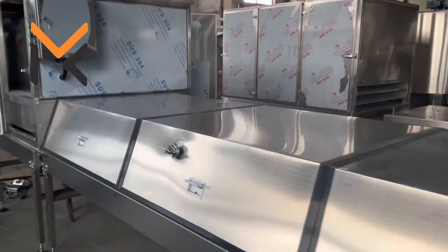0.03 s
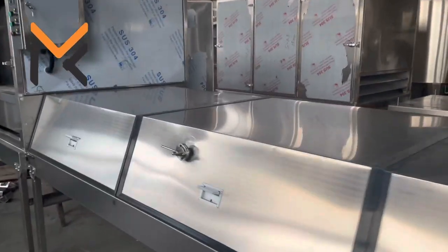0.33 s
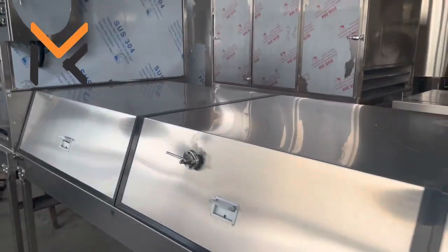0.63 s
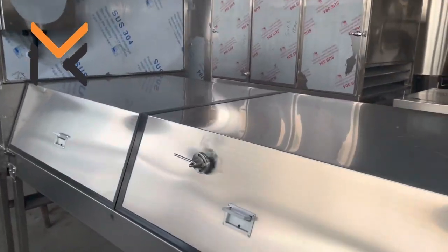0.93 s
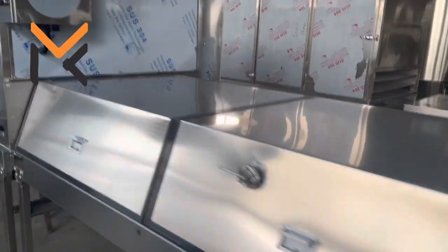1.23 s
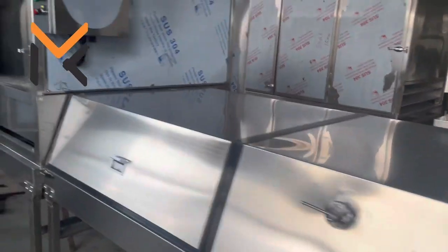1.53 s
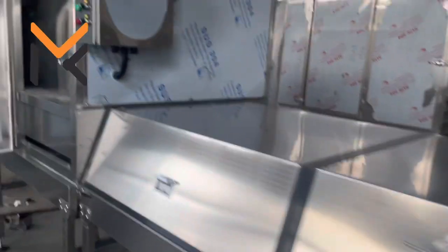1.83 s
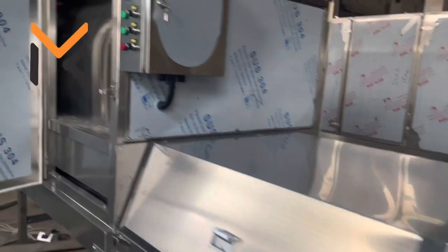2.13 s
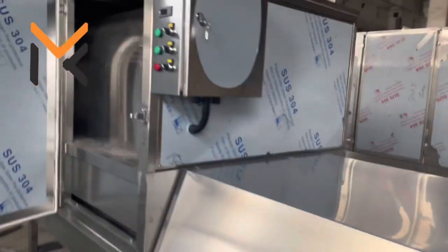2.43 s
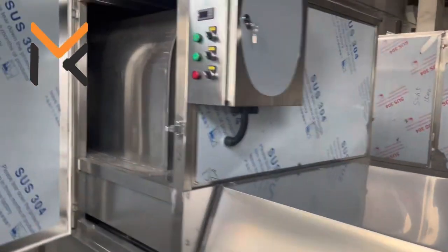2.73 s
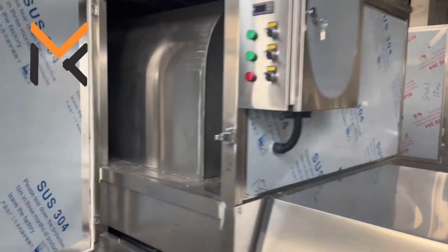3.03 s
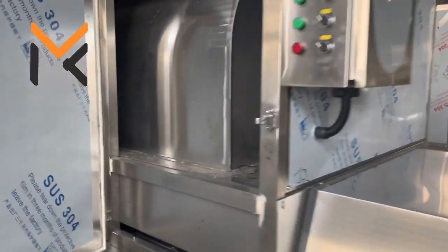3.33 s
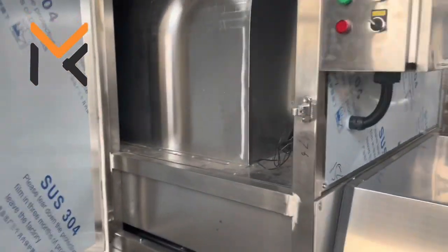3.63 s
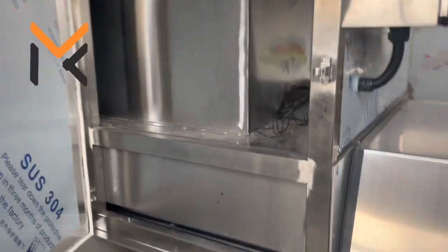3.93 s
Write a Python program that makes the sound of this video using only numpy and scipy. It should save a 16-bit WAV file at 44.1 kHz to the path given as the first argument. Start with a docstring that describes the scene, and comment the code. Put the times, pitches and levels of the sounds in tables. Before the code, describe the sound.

A large steel sheet is struck twice across a workshop hall, each bright crash swelling into a slowly fading boom. A small metal part then clinks near the microphone, followed by faint knocks, while machinery rumbles steadily.

```python
"""A sheet-metal workshop

Machinery rumbles under a faint motor whine. Across the hall a big steel sheet is struck twice:
its high modes ring at once as a crash, while its low modes build up into a slowly fading boom.
A small steel part scrapes and clinks nearby; ticks, far clanks and hisses of other work come and go."""
import sys
import numpy as np
from scipy import signal
from scipy.fft import rfft, irfft
from scipy.io import wavfile
from scipy.ndimage import map_coordinates

SR = 44100
rng = np.random.default_rng(int(sys.argv[2]) if len(sys.argv) > 2 else 0)


def digitize_waveform(pressure):
    """Quantize a signal to 16-bit integers and store it at the path in sys.argv[1].

    Rows of a 2-D input are taken as channels; values are limited to [-1, 1].
    """
    field = np.atleast_2d(pressure).T
    bounded = np.clip(field, -1, 1)
    quanta = np.round(bounded * 32767).astype(np.int16)
    wavfile.write(sys.argv[1], SR, quanta)


N = 176400
T = np.arange(N) / SR
HZ = np.fft.rfftfreq(N, 1 / SR)

# Spectra of the noises. Each row: frequency in Hz, relative spectral density in dB.
RUMBLE_SPECTRUM = [(15, -60), (26, -38), (35, -13.5), (52, 4.5), (68, 3), (95, -6.5), (125, -11.5),
                   (170, -9.5), (260, -42.5), (440, -75)]
HALL_SPECTRUM = [(70, -8.5), (125, -1), (170, -2), (220, -3), (300, -2.5), (450, -11), (640, -10.5),
                 (900, -9), (1400, -16.5), (1900, -19), (2300, -20.5), (2600, -24), (3300, -29),
                 (4000, -31), (4700, -36.5), (6600, -40.5), (8500, -56.5), (11500, -43), (13500, -50),
                 (15500, -56.5)]
SNAP_SPECTRUM = [(500, -12), (1100, 1), (2500, -4), (3600, 3), (4800, -10), (8000, -17), (11000, -18),
                 (15000, -32)]
CRACK_SPECTRUM = [(300, -17), (1000, 6), (3500, 7), (4800, -8), (8000, -16), (11000, -10.5), (15000, -34)]
SCRAPE_SPECTRUM = [(400, 9), (750, 0), (1400, 4), (2500, 4), (3300, 7.5), (4800, -4.5), (5600, -7),
                   (8000, -15), (11000, -11), (13000, -22), (15500, -22)]
# Likeness of the two channels. Each row: frequency in Hz, left-right correlation.
HALL_COHERENCE = [(50, 0.94), (150, 0.94), (300, 0.69), (600, 0.23), (1200, -0.18), (4000, 0.17),
                  (12000, 0.11)]
SHEET_COHERENCE = [(150, 0.96), (300, 0.9), (600, 0.32), (1100, 0.13), (2200, 0), (4000, 0.73), (7000, 0.2)]
CONTACT_COHERENCE = [(500, 0.6), (1100, -0.3), (3500, -0.07), (6000, -0.7), (11000, -0.15)]
# Stereo balance. Each row: frequency in Hz, left minus right level in dB.
BALANCE = [(60, 0), (130, -3), (290, -1), (640, 0.5), (1410, -1), (3100, 0), (6820, 1.0), (15000, -0.5)]

# Swells of the rumble. Each row: centre in seconds, gain in dB, half length in seconds.
SURGES = [(0.253, 10, 0.042), (0.487, 3.5, 0.088), (1.957, 9.5, 0.051), (2.166, 5, 0.093),
          (2.51, 5.5, 0.034), (2.833, 9.5, 0.016), (3.06, 2.5, 0.029), (3.88, 7, 0.049)]
# The hall's broad noise. Each row: time in seconds, level in dB.
HALL_LEVEL = [(0, -43.5), (.5, -42.5), (2.2, -43), (2.8, -44.5), (3.45, -45), (3.7, -45.5), (4, -46.5)]
# Motor partials. Each row: frequency in Hz, level in dB, width in Hz, share of the drift in dB per dB.
WHINE_PARTIALS = [(861, -65.5, 35, 0), (1987, -70.5, 9, 1.3), (2014, -70.5, 9, .6), (2460, -70, 14, -1.3),
                  (2505, -73, 30, -.8)]
# The whine's weight drifts to its lower partials. Each row: time in seconds, drift in dB.
WHINE_DRIFT = [(0, -2), (2.55, -1.5), (2.68, 2.5), (3.4, 1), (4, 4.5)]
# Ticks, taps and far clanks. Each row: start in seconds, level in dB, band centre in Hz,
# width in octaves, rise and T60 in seconds.
KNOCKS = [(.038, -63, 6000, .6, .0005, .035), (.0705, -63, 6000, .6, .0005, .035),
          (.161, -63, 5500, .6, .0005, .035), (.1945, -61, 6000, .6, .0005, .035),
          (.4703, -53, 4500, .6, .0002, .008), (2.2, -54, 900, .3, .006, .25),
          (2.43, -55, 900, .3, .006, .3), (2.6655, -38, 1650, .42, .0002, .014),
          (2.925, -52, 950, .3, .008, .4), (3.175, -48.5, 950, .25, .006, .3),
          (3.421, -47.5, 900, .28, .005, .33), (3.423, -60, 3700, .25, .003, .23),
          (3.881, -38.5, 436, .57, .0012, .066)]
# Soft hisses. Each row: centre in seconds, level in dB, band centre in Hz, width in octaves,
# half length in seconds.
HISSES = [(0.483, -71, 5000, .32, 0.093), (2.453, -68.5, 5330, .11, 0.19), (2.706, -75, 11100, 0.23, 0.068),
          (3.392, -74.5, 11200, 0.25, 0.047), (3.918, -71, 10100, 0.38, 0.038),
          (3.93, -66, 4280, 0.49, 0.056)]
# Hammer blows. Each row: start in seconds, gain of wash and snap in dB, the wash's treble tilt in dB
# per octave, its gains below 450 Hz and below 220 Hz in dB, the sheet's left minus right level in dB.
BLOWS = [(0.5638, -1, 2, 0.5, -5.5, -.5), (1.117, -1.9, 1.73, -1, 3, 0)]
# The sheet's wash of dense modes. Each row: frequency in Hz, relative density in dB,
# rise and T60 in seconds.
WASH_BANDS = [(106, 1.5, 0.45, 2.9), (170, 10, 0.55, 3.05), (212, 2.5, 0.24, 3.93), (269, 7.5, 0.11, 3.6),
              (409, 5, 0.47, 3.2), (426, -6, 0.026, 4.9), (637, -2, 0.0015, 3.26),
              (827, -14.5, 0.0083, 4.2), (1035, -6.5, 0.0031, 3.4), (1170, -11.5, .004, 1.85),
              (1650, -17, .008, 3.1), (2050, -23.5, 0.012, 3.4), (2650, -22, 0.013, 3.6),
              (3250, -24, .004, 1.5), (4350, -33, 0.0082, 1.65), (6820, -32, 0.0066, 0.92),
              (8330, -56, .002, 0.36), (11000, -42, .004, 0.67), (15000, -64, .002, .35)]
# Its strongest modes. Each row: frequency in Hz, peak levels in the first and second blow in dB,
# rise and T60 in seconds.
SHEET_MODES = [(262, -36.5, -39.5, .11, 2), (305, -39, -41, .13, 1.8), (345, -39.5, -45, .25, 1.7),
               (372, -46, -39.5, .45, 1.8), (409, -49, -45.5, .45, 1.8), (538, -42, -44, .01, 1.9),
               (590, -45, -46, .005, 1.2), (640, -44, -45, .01, 1.9), (705, -52, -48, .01, 1.9),
               (842, -47, -50, .005, 1.5), (953, -48, -54, .005, 1.6), (1010, -45, -48, .003, 1.5),
               (1048, -43, -38.5, .003, 1.6), (1072, -41, -43, .003, 1.7), (1256, -56, -44, .003, 1.7),
               (1388, -49.5, -52, .005, 1.6), (1495, -43.5, -47, .003, 1.9), (1530, -52, -50, .005, 1.8),
               (1620, -51, -50.5, .005, 1.7), (1758, -54, -51, .005, 1.9), (1812, -54, -51, .005, 1.9),
               (2274, -49.5, -54, .005, 2.7), (2305, -54, -53, .005, 2.9), (2557, -56, -62, .005, 2),
               (2643, -55, -59, .005, 2), (2762, -58, -55, .005, 1.7), (3362, -60.5, -58, .005, 2),
               (3520, -44, -56, .0007, .25), (3850, -45, -55, .0007, .22)]
# Contacts of hammer and rattling sheet. Each row: start in seconds, gain in dB,
# relative level of the body near 1 kHz in dB.
CRACKS = [(0.564, -2.5, 2), (0.581, 6.5, -9), (.657, -13, 7), (1.119, -3, 13)]
# Contacts of the small part. Each row: start in seconds, gain in dB, rise in seconds.
CLINKS = [(1.906, -11.5, 0.0041), (1.921, 1.5, .006), (1.9285, -1.5, 0.0039), (1.941, -10.5, 0.0018),
          (1.951, -16, .001)]
# Its modes. Each row: frequency in Hz, level in dB, T60 in seconds.
PART_MODES = [(1850, -48, .1), (2400, -48, .08), (3214, -44, .16), (3370, -45.5, .14), (4253, -48, .09),
              (4716, -45.5, .12), (11010, -57, .12), (15540, -57, .07)]


def amp(db):
    """Amplitude grows tenfold with every 20 dB."""
    return 10 ** (np.asarray(db) / 20)


def unit_rms(x):
    """Normalisation brings the mean power to one."""
    return x / np.sqrt(np.mean(x ** 2) + 1e-20)


def over_hz(points):
    """Interpolation on a log-frequency axis joins (Hz, value) points."""
    hz, values = np.transpose(points)
    return np.interp(np.log(HZ + 1), np.log(hz + 1), values)


def over_time(points):
    """Linear interpolation joins (seconds, value) points."""
    return np.interp(T, *np.transpose(points))


def wobble(knots_per_s):
    """A spline through random values fluctuates smoothly."""
    return map_coordinates(rng.standard_normal(2000), [T * knots_per_s + 2])


def ripple(depth_db, spacing_hz):
    """Close modes of unequal strength make a spectrum uneven."""
    return amp(depth_db * map_coordinates(rng.standard_normal(5000), [HZ / spacing_hz + 2]))


def bell(offset, width):
    """A Gaussian falls away evenly on both sides of its peak."""
    return np.exp(-.5 * (offset / width) ** 2)


def band(hz, octaves):
    """A Gaussian in log frequency forms a pass band."""
    return bell(np.log2((HZ + 1) / hz), octaves)


def ring(start, rise, t60):
    """A damped vibration builds up, then loses 60 dB every t60 seconds."""
    age = np.maximum(T - start, 0)
    return (1 - np.exp(-age / rise)) * np.exp(-np.log(1000) * age / t60)


def swell(start, rise, t60):
    """Energy seeps into a mode, so its envelope climbs softly to a peak of one."""
    shape = ring(start, rise, 2 * t60) ** 2
    return shape / shape.max()


def noise(gain, coherence):
    """The ratio of mid to side sets the correlation of a shaped stereo noise."""
    angle = np.arccos(over_hz(coherence)) / 2
    spectra = rfft(rng.standard_normal((2, N))) * gain
    mid, side = irfft(spectra * [np.cos(angle), np.sin(angle)], N)
    return unit_rms(np.array([mid + side, mid - side]))


def tone(hz, width_hz, rough):
    """Interference among the hall's many paths blurs a tone's amplitude and phase."""
    knots = np.arange(0, N + 200, 100)
    position = knots / SR * width_hz + 2
    blur = np.array([map_coordinates(row, [position]) for row in rng.standard_normal((4, 420))])
    phasors = np.exp(2j * np.pi * rng.random((2, 1))) + rough * (blur[:2] + 1j * blur[2:])
    carrier = np.exp(2j * np.pi * hz * T)
    waves = [(np.interp(np.arange(N), knots, phasor) * carrier).real for phasor in phasors]
    angle = np.arccos(np.interp(hz, *np.transpose(SHEET_COHERENCE))) / 2
    mid, side = waves[0] * np.cos(angle), waves[1] * np.sin(angle)
    return unit_rms(np.array([mid + side, mid - side]))


def machinery():
    """A surging rumble, the hall's broad noise and a motor's narrow partials superpose."""
    surge_db = sum(db * bell(T - centre, half) for centre, db, half in SURGES)
    rumble = noise(amp(over_hz(RUMBLE_SPECTRUM)), HALL_COHERENCE) * amp(-44 + surge_db)
    colour = amp(over_hz(HALL_SPECTRUM)) * ripple(depth_db=2.06, spacing_hz=29.63)
    hall = noise(colour, HALL_COHERENCE) * amp(over_time(HALL_LEVEL) + .31 * wobble(7.08))
    whine = sum(amp(db + share * over_time(WHINE_DRIFT)) * tone(hz, width, rough=1)
                for hz, db, width, share in WHINE_PARTIALS)
    return rumble + hall + whine


def knocks():
    """Each impact around the hall excites a band of noise that decays exponentially."""
    return sum(amp(db) * noise(band(hz, width), HALL_COHERENCE) * ring(start, rise, t60)
               for start, db, hz, width, rise, t60 in KNOCKS)


def hisses():
    """High bands of noise with no sharp onset are heard as soft hisses."""
    return sum(amp(db) * noise(band(hz, width), HALL_COHERENCE) * bell(T - centre, half)
               for centre, db, hz, width, half in HISSES)


def shimmer(wash, depth_db=2.6, patch_hz=170, patch_s=.045):
    """Energy wanders among a flexing sheet's upper modes, giving patches of random gain."""
    hz, t, spectra = signal.stft(wash, SR, nperseg=1024)
    grid = np.meshgrid(hz / patch_hz + 2, t / patch_s + 2, indexing="ij")
    patches = map_coordinates(rng.standard_normal((160, 110)), grid, order=2)
    spread_db = depth_db * np.interp(hz, [300, 1200, 3500, 7000], [0, 1, 1, .4])
    _, shimmering = signal.istft(spectra * amp(spread_db[:, None] * patches), SR, nperseg=1024)
    return unit_rms(shimmering[:, :N])


def sheet(wash_db=-22.5, beat_db=2, lag_s=.00022):
    """A struck plate rings in many modes: the treble speaks at once, the bass builds late and lingers."""
    out = np.zeros((2, N))
    centres = [row[0] for row in WASH_BANDS]
    filters = [over_hz(list(zip(centres, weights))) for weights in np.eye(len(WASH_BANDS))]
    colour = amp(over_hz([row[:2] for row in WASH_BANDS]))
    colour *= ripple(depth_db=1.5 * HZ / (HZ + 500), spacing_hz=20.93)
    colour /= np.sqrt(1 + (90 / (HZ + 1)) ** 6)  # high-pass at 90 Hz
    for k, (start, db, tilt_db, boom_db, deep_db, pan_db) in enumerate(BLOWS):
        wash = rfft(shimmer(noise(colour, SHEET_COHERENCE))) * amp(wash_db)
        blow = np.zeros((2, N))
        for passband, (hz, _, rise, t60) in zip(filters, WASH_BANDS):
            treble_db = tilt_db * max(np.log2(hz / 1000), 0)
            bass_db = boom_db / (1 + (hz / 450) ** 4) + deep_db / (1 + (hz / 220) ** 8)
            blow += irfft(wash * passband, N) * amp(db + treble_db + bass_db) * ring(start, rise, t60)
        for hz, *peak_db, rise, t60 in SHEET_MODES:
            mode = tone(hz, width_hz=20 + .008 * hz, rough=1.5)
            beating_db = beat_db * wobble(knots_per_s=11)  # close pairs of modes beat irregularly
            blow += mode * amp(peak_db[k] + beating_db) * swell(start, rise, t60)
        out += blow * amp([[pan_db / 2], [-pan_db / 2]])
    # The sheet lies to the right, so its sound reaches the left side later.
    delay = np.exp(np.outer([-1, 1], 1j * np.pi * HZ * lag_s))
    return irfft(rfft(out) * delay, N)


def snaps():
    """The direct sound of each blow takes the shortest path and peaks ahead of the wash."""
    colour = amp(over_hz(SNAP_SPECTRUM))
    return sum(amp(-32 + db) * noise(colour, CONTACT_COHERENCE) * ring(start, rise=.0005, t60=.06)
               for start, db, *_ in BLOWS)


def cracks():
    """A hard contact is brief, so its spectrum is broad: a bright edge over a midrange body."""
    out = np.zeros((2, N))
    colour = amp(over_hz(CRACK_SPECTRUM)) * ripple(depth_db=6.1, spacing_hz=60)
    for start, db, body_db in CRACKS:
        edge = noise(colour, CONTACT_COHERENCE) * ring(start, rise=.0029, t60=.14)
        body = noise(band(1080, .24), CONTACT_COHERENCE) * ring(start, rise=.0011, t60=.13)
        out += amp(-37.5 + db) * (edge + amp(body_db) * body)
    return out


def clink(scrape_db=-25.5, brighten_db_per_s=300, room_db=-12):
    """A steel part skids and lands: ever brighter contacts excite its modes, and the hall reverberates."""
    out = np.zeros((2, N))
    colour = amp(over_hz(SCRAPE_SPECTRUM)) * ripple(depth_db=3.3, spacing_hz=70)
    for start, db, rise in CLINKS:
        treble_db = brighten_db_per_s * (start - CLINKS[2][0]) * band(11000, .96)
        scrape = noise(colour * amp(treble_db), CONTACT_COHERENCE)
        out += amp(db + scrape_db) * scrape * ring(start, rise, t60=.096)
    for hz, mode_db, t60 in PART_MODES:
        energy = sum((amp(db) * ring(start, rise, t60)) ** 2 for start, db, rise in CLINKS)
        out += amp(mode_db) * tone(hz, width_hz=70, rough=1.2) * np.sqrt(energy)
    response = rng.standard_normal((2, SR)) * ring(.005, rise=.027, t60=.31)[:SR]
    response /= np.linalg.norm(response[0])
    return out + amp(room_db) * signal.fftconvolve(out, response, axes=1)[:, :N]


def scene():
    """The sources add linearly; a level difference leans the bass a little to the right."""
    mix = machinery() + knocks() + hisses() + sheet() + snaps() + cracks() + clink()
    return irfft(rfft(mix) * amp(np.outer([.5, -.5], over_hz(BALANCE))), N)


def record(dry, cutoff_hz=15850):
    """A steep elliptic low-pass limits the bandwidth."""
    return signal.sosfilt(signal.ellip(10, .1, 80, cutoff_hz, fs=SR, output="sos"), dry)


dry = scene()
out = record(dry)
digitize_waveform(out)
```